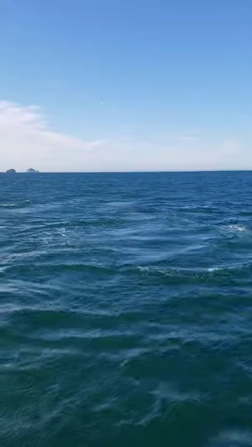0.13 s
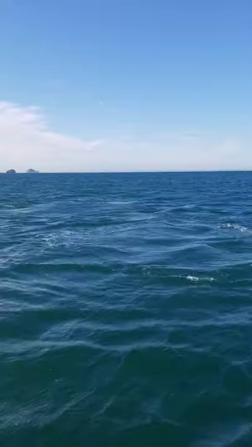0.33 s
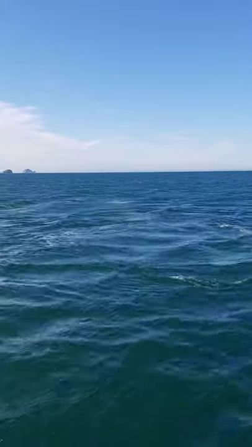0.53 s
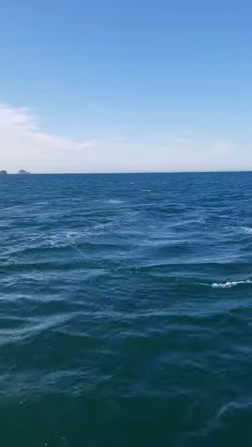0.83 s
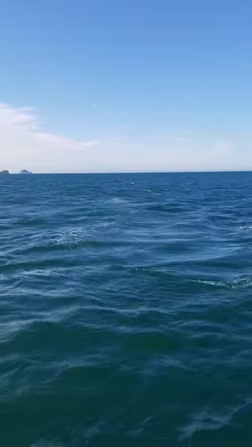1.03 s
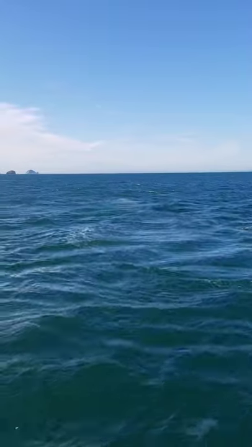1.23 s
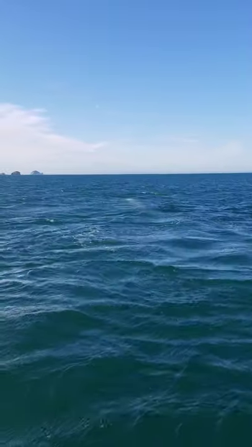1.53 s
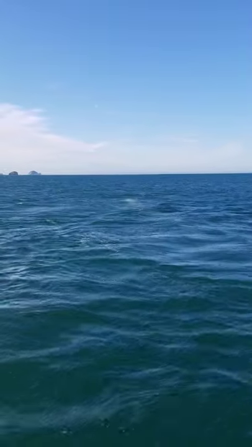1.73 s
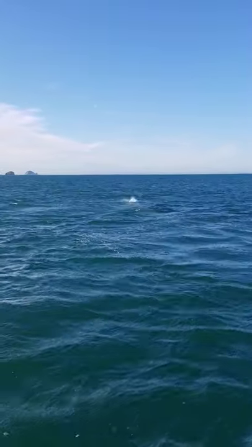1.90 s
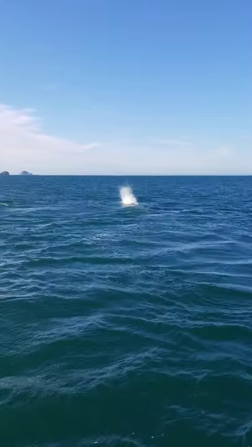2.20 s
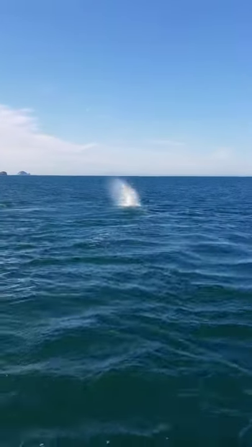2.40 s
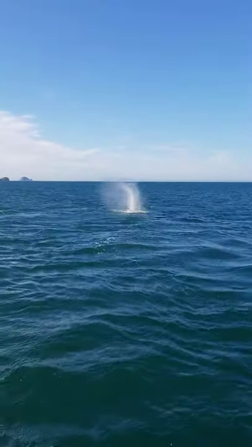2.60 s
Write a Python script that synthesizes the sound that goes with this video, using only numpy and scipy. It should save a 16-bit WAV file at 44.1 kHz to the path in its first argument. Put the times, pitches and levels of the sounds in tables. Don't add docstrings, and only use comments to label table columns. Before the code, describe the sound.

Strong low wind flutter over open water, with a faint airy whale blow near the end

```python
import sys
import numpy as np
from scipy import signal
from scipy.fft import rfft, irfft
from scipy.io import wavfile
from scipy.ndimage import uniform_filter1d

SR = 44100
rng = np.random.default_rng(int(sys.argv[2]) if len(sys.argv) > 2 else 0)


def voltage_ratio(decibels):
    exponent = np.asarray(decibels, float) / 20
    return 10 ** exponent


def output_pcm(signal):
    pcm = np.clip(np.atleast_2d(signal).T, -1, 1) * 32767
    wavfile.write(sys.argv[1], SR, np.round(pcm).astype(np.int16))


N = 121275
TIME = np.arange(N) / SR
START_S = 0.0696

# f/Hz, level/dB
SEA_COLOUR = [(200, -12.5), (500, -12), (1000, -9), (1600, -9.5), (2500, -18.5), (3500, -22), (6000, -36),
              (16000, -70.5)]
# t/s, level/dB
WAVES = [(0.09, -55), (0.16, -61.5), (0.21, -56.5), (0.31, -62.5), (0.61, -57.5), (0.62, -64),
         (0.77, -59.5), (0.84, -66.5), (0.85, -58.5), (1.28, -64.5), (1.42, -59), (1.96, -58), (1.99, -63),
         (2.02, -60), (2.24, -55.5), (2.3, -57)]
# t/s, level/dB, f/Hz
TICKS = [(0.0682, -57, 4330), (0.478, -53, 5500), (0.53, -52.5, 4660), (0.545, -54.5, 5300),
         (0.601, -48.5, 4500), (0.846, -45, 1520), (0.906, -49, 1400), (0.9995, -50, 4700),
         (1.654, -40, 1730), (1.694, -51.5, 5270), (1.9877, -37, 2000), (2.0577, -56, 3000),
         (2.094, -40, 1900), (2.1438, -56, 4700), (2.562, -51, 3200)]
# f/Hz, likeness/1
LIKENESS = [(200, 0.099), (800, 0.6), (1500, 0.68), (2500, 0.48), (4000, 0.29)]
# t/s, f/Hz, length/s, level/dB
BUBBLES = [(.1, 1230, .03, -46), (.464, 3580, .016, -52), (.95, 3150, .016, -55), (1.135, 620, .022, -39),
           (1.497, 3260, .022, -52), (1.61, 2100, .016, -56), (1.762, 1230, .016, -49),
           (1.775, 1050, .018, -49), (2.197, 3300, .04, -49), (2.562, 245, .036, -17),
           (2.68, 200, .04, -27), (1.785, 200, .03, -30)]

# t/s, level/dB, length/s
GUSTS_LEFT = [(0.103, -15.5, 0.018), (0.254, -13.5, 0.045), (0.327, -21.5, 0.078), (0.435, -18.5, 0.039),
              (0.594, -18, 0.045), (0.748, -9.5, 0.019), (0.866, -13.5, 0.021), (0.955, -18, 0.019),
              (1.167, -18.5, 0.021), (1.373, -12.5, 0.02), (1.527, -14, 0.013), (1.569, -40, 0.015),
              (1.714, -29.5, 0.016), (1.96, -23, 0.066), (2.009, -19, 0.0084), (2.14, -32, 0.025),
              (2.227, -13, 0.019), (2.416, -19, 0.098), (2.462, -8, 0.014), (2.506, -5, 0.036),
              (2.622, -27, 0.077), (2.748, -9, 0.022)]
GUSTS_RIGHT = [(0.103, -38, 0.018), (0.257, -19.5, 0.021), (0.363, -29, 0.03), (0.437, -13, 0.063),
               (0.596, -13, 0.014), (0.668, -15, 0.013), (0.749, -13.5, 0.053), (0.864, -15, 0.037),
               (0.956, -5.5, 0.02), (1.208, -19.5, 0.014), (1.244, -20, 0.023), (1.371, -11.5, 0.016),
               (1.421, -27, 0.1), (1.668, -14.5, 0.017), (1.752, -23.5, 0.018), (1.988, -20.5, 0.068),
               (2.135, -22.5, 0.12), (2.24, -7.5, 0.012), (2.413, -31, 0.025), (2.472, -20.5, 0.028),
               (2.509, -11, 0.063), (2.748, -6.5, 0.015)]
# t/s, level/dB
SNAPS_LEFT = [(0.078, -54), (0.375, -26), (0.423, -25.5), (0.618, -28), (0.64, -24), (0.671, -26),
              (0.745, -17), (0.781, -16), (0.847, -29), (0.871, -36), (0.962, -27.5), (1.207, -30),
              (1.38, -21.5), (1.421, -27), (1.661, -28), (1.715, -35), (1.886, -34), (1.91, -25.5),
              (1.991, -20), (2.078, -27.5), (2.192, -20), (2.231, -16.5), (2.464, -24), (2.512, -19.5),
              (2.552, -15), (2.58, -16), (2.615, -30), (2.748, -24.5)]
SNAPS_RIGHT = [(0.083, -42), (0.105, -27), (0.23, -24), (0.604, -25), (0.671, -23.5), (0.769, -19),
               (0.81, -27), (0.847, -22), (0.963, -39), (1.376, -19), (1.423, -26), (1.71, -20),
               (1.874, -27), (1.928, -22.5), (1.989, -19.5), (2.072, -30), (2.192, -17.5), (2.222, -19.5),
               (2.3, -25.5), (2.341, -27.5), (2.417, -30), (2.466, -21), (2.494, -18), (2.52, -26.5),
               (2.591, -16), (2.669, -25.5), (2.692, -28), (2.748, -39)]
# f/Hz, level/dB
RUMBLE_COLOUR = [(18, -44.5), (38, -4), (60, 4.5), (110, 2.5), (200, -6), (300, -21), (500, -51),
                 (1200, -120)]
FLUTTER_COLOUR = [(60, -45), (250, 4.5), (400, 0), (700, -14.5), (1200, -33), (2000, -37.5), (3500, -66.5),
                  (9000, -110)]
# t/s, length/s, level/dB
LULLS = [
    (1.295, 0.022, -12),
    (1.83, 0.027, -11.5),
    (1.56, 0.028, -3.5),
]
# t/s, peak level/dB, left minus right/dB
FLAPS = [(0.068, -49, -0.5), (0.1, -32, -10), (0.232, -38.5, 6), (0.27, -30, -8.5), (0.316, -34, -8),
         (0.372, -29.5, -2), (0.467, -33, -4), (0.497, -31.5, -2), (0.52, -34, -14), (0.603, -36.5, -6.5),
         (0.672, -43, -3.0), (0.744, -27.5, -5), (0.781, -22, -3.5), (0.81, -34.5, -1.5), (0.844, -34, -18),
         (0.903, -35, -10), (0.959, -37, -4), (1.143, -42, 9), (1.171, -37, 8.5), (1.272, -39, -8.5),
         (1.37, -33, 5.5), (1.42, -44, -2), (1.459, -41, 1.0), (1.655, -33, 7.5), (1.706, -36, 5),
         (1.879, -36, 7), (1.911, -25, 7.5), (1.974, -31.5, 4.0), (2.004, -28.5, -1.5), (2.054, -31, 4),
         (2.122, -29.5, 2), (2.159, -29.5, -1.5), (2.192, -25.5, 0), (2.219, -23.5, -1.5),
         (2.3, -22.5, -2.5), (2.368, -32, 4), (2.459, -22, 1), (2.615, -29.5, -12.5), (2.636, -31.5, -11),
         (2.667, -27.5, 1)]
# f/Hz, level/dB
FLAP_COLOUR = [(200, -27), (400, 4), (700, -1.5), (1200, -19), (2000, -36.5), (4000, -63)]

# t/s, level/dB, spray level/dB
BREATH = [
    (2.0, -79, -19.5),
    (2.148, -52.5, -8),
    (2.288, -40, -2),
    (2.362, -38, -1),
    (2.448, -35.5, -4.5),
    (2.522, -35, -6.5),
    (2.64, -42.5, 8.5),
    (2.702, -41.5, 4.5),
    (2.75, -50, 2),
]
# f/Hz, level/dB
JET_COLOUR = [(200, 2.5), (500, 9), (900, 2.5), (1600, -7), (2500, -12.5), (3300, -20.5), (5600, -29),
              (16000, -77.5)]
SPRAY_COLOUR = [(2000, -17.5), (4000, 2.5), (6000, -3), (9000, -2), (12000, 7), (16000, 4.5)]
# f/Hz, width/Hz, level/dB
BLOWHOLE = [
    (1377, 98, -17),
    (2104, 330, -16.5),
    (3000, 1100, -24),
]
# f/Hz, width/Hz, level/dB
DIPS = [(6450, 330, -14), (8100, 450, -11), (9100, 250, -8)]

# f/Hz, level/dB
MIC_COLOUR = [(3000, 2.5), (4200, 0.5), (5500, 3), (6600, -1), (8800, -2.5), (10500, -4.5), (13000, -6),
              (15500, -9.5)]
# f/Hz, left minus right/dB
TILT = [(1000, 0.5), (3000, -1.5), (6000, 2), (9000, 5)]
# start t/s, end t/s, level/dB
CUTS_LEFT = [(1.13, 1.15, -30), (1.185, 1.23, -30), (1.44, 1.505, -44), (1.6, 1.635, -38),
             (1.665, 1.69, -41), (1.765, 1.865, -43), (1.865, 1.935, -38), (2.03, 2.125, -25),
             (2.17, 2.19, -28)]
CUTS_RIGHT = [(0.112, 0.242, -48), (0.29, 0.348, -36), (0.384, 0.449, -21), (0.466, 0.588, -59),
              (0.878, 0.954, -34), (0.956, 1.117, -21), (1.286, 1.333, -47), (2.277, 2.387, -51),
              (2.426, 2.467, -18), (2.61, 2.742, -39)]


def evened(x):
    return x / np.sqrt(np.mean(x ** 2) + 1e-20)


def read(points, hz):
    f, value = np.transpose(points)
    return np.interp(np.log(hz + 1), np.log(f + 1), value)


def colour(x, points):
    hz = np.fft.rfftfreq(N, 1 / SR)
    return irfft(rfft(x) * voltage_ratio(read(points, hz)), N)


def drift(top_hz, channels=1):
    noise = rng.standard_normal((channels, N))
    return evened(colour(noise, [(1, -10), (top_hz / 2, 0), (2 * top_hz, -15), (10 * top_hz, -90)]))


def smooth_twice(x, size_a, size_b, axis_a=-1, axis_b=-1):
    return uniform_filter1d(uniform_filter1d(x, size_a, axis=axis_a), size_b, axis=axis_b)


def airborne(points, patch_db):
    frames, hz = N // 128 + 5, np.fft.rfftfreq(512, 1 / SR)
    a, b, c, d, patches = rng.standard_normal((frames, 257, 5)).T
    patches = evened(smooth_twice(patches, 6, 20, axis_a=0, axis_b=1))
    left, other = a + 1j * b, c + 1j * d
    same = np.clip(read(LIKENESS, hz), -1, 1)[:, None]
    lag = np.exp(-2j * np.pi * hz * 0.000136)[:, None]
    right = same * lag * left + np.sqrt(1 - same ** 2) * other
    gain = voltage_ratio(read(points, hz)[:, None] + patch_db * patches)
    return evened(signal.istft(np.array([left, right]) * gain, nperseg=512, noverlap=384)[1][:, :N])


def hiss():
    return voltage_ratio(-61.5) * airborne(SPRAY_COLOUR, patch_db=0.94)


def sea():
    wash_db = 3.5 + np.interp(TIME, *np.transpose(WAVES)) + 0.84 * drift(45)
    out = voltage_ratio(wash_db) * airborne(SEA_COLOUR, patch_db=3.5)
    t = np.arange(800) / SR
    for s, db, hz in TICKS:
        noise = rng.standard_normal((2, 800))
        tone = np.sin(2 * np.pi * hz * t)
        splash = smooth_twice(noise, round(SR / hz / 2), round(SR / hz / 3))
        fade = voltage_ratio(db - 60 * t / 0.016)
        start = round(max(s, START_S) * SR)
        out[:, start:][:, :800] += (0.47 * tone + 1.9 * splash) * fade
    return out


def bubbles():
    out = np.zeros(N)
    for s, hz, length, db in BUBBLES:
        u = np.clip((TIME - s) / length, 0, 1)
        out += voltage_ratio(db) * np.sin(np.pi * u) * np.sin(2 * np.pi * hz * length * u * (1 + u / 50))
    return np.array([out, 0.5 * np.roll(out, 6)])


def eddies(points, size):
    x = colour(rng.standard_normal(N), points)
    power = abs(smooth_twice(x ** 2, size, size))
    return evened(x / np.sqrt(power + 1e-12))


def swells(s, level_db, length, floor_db):
    rise = 0.71
    side = length * np.where(TIME < s, rise, 2 - rise)
    bell = np.exp(-5.5 * ((TIME - s) / side) ** 2)
    return np.sqrt(voltage_ratio(2 * floor_db) + (voltage_ratio(2 * (level_db - 5)) * bell).sum(0))


def wind(gusts, snaps):
    breeze_db, breeze_flutter_db = -33, -43
    lumps_db, own_lumps_db = 2, 2
    low = swells(*np.transpose(gusts)[:, :, None], breeze_db)
    lumps, own = drift(50, channels=2)
    flutter_floor_db = breeze_flutter_db + lumps_db * lumps + own_lumps_db * own
    high = swells(*np.transpose(snaps)[:, :, None], 0.016, flutter_floor_db)
    rumble = low * voltage_ratio(0.5 * lumps_db * lumps) * eddies(RUMBLE_COLOUR, size=900)
    return rumble + high * eddies(FLUTTER_COLOUR, size=300)


def gusty_wind():
    ports = np.array([wind(GUSTS_LEFT, SNAPS_LEFT), wind(GUSTS_RIGHT, SNAPS_RIGHT)])
    lull_db = sum(db * np.exp(-((TIME - s) / length) ** 2) for s, length, db in LULLS)
    return voltage_ratio(lull_db) * ports


def flaps():
    rise_s, t60_s = 0.0015, 0.073
    s, db, pan_db = np.transpose(FLAPS)[:, :, None]
    u = np.maximum(TIME - s, 0)
    shape = np.minimum(u / rise_s, 1) * voltage_ratio(db - 5 - 60 * u / t60_s)
    left = (shape * voltage_ratio(0.5 * pan_db)).max(0) * eddies(FLAP_COLOUR, size=150)
    right = (shape * voltage_ratio(-0.5 * pan_db)).max(0) * eddies(FLAP_COLOUR, size=150)
    return np.array([left, right])


def resonate(x, hz, width):
    turn, r = np.exp(2j * np.pi * hz * TIME), np.exp(-np.pi * width / SR)
    return 2 * (turn * signal.lfilter([1 - r], [1, -r], x / turn)).real


def dipped(x):
    hz = np.fft.rfftfreq(N, 1 / SR)
    gaps_db = sum(db * np.exp(-((hz - f) / w) ** 2) for f, w, db in DIPS)
    return irfft(rfft(x) * voltage_ratio(gaps_db), N)


def whale():
    s, level_db, spray_db = np.transpose(BREATH)
    level = voltage_ratio(np.interp(TIME, s, level_db))
    jet = airborne(JET_COLOUR, patch_db=3.0)
    air = airborne(JET_COLOUR, patch_db=0.91)
    rings = 0
    for k, (hz, width, db) in enumerate(BLOWHOLE):
        ring = resonate(resonate(air, hz, width), hz, width)
        rings = rings + (-1) ** k * voltage_ratio(db) * evened(ring)
    spray = voltage_ratio(-16 + np.interp(TIME, s, spray_db)) * airborne(SPRAY_COLOUR, patch_db=2.2)
    rattle = voltage_ratio(2.6 * drift(60))
    return level * (rattle * dipped(jet + rings) + dipped(spray))


def scene():
    return hiss() + sea() + bubbles() + gusty_wind() + flaps() + whale()


def low_pass(x):
    return signal.sosfilt(signal.butter(12, 15760, fs=SR, output="sos"), x)


def record(dry):
    x = colour(dry, MIC_COLOUR)
    left = colour(x[0], np.multiply(TILT, [1, 0.5]))
    right = colour(x[1], np.multiply(TILT, [1, -0.5]))
    x = np.array([left, right])
    cut_hz, fade = 270, round(0.008 * SR)
    bass = colour(x, [(cut_hz / 1.5, 0), (cut_hz, -5), (cut_hz * 1.4, -45), (20000, -90)])
    cut_db = [sum(db * ((TIME > a) & (TIME < b)) for a, b, db in cuts) for cuts in (CUTS_LEFT, CUTS_RIGHT)]
    keep = smooth_twice(voltage_ratio(cut_db), fade, fade)
    mix = (x - (1 - keep) * bass) * (TIME > START_S)
    return low_pass(mix)


dry = scene()
out = record(dry)
output_pcm(out)
```